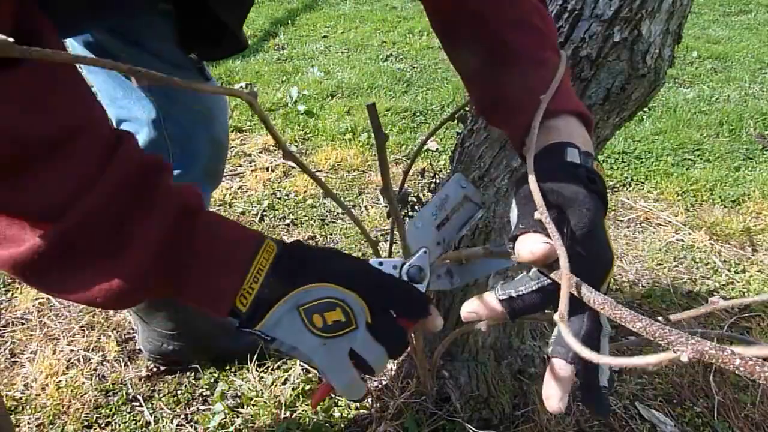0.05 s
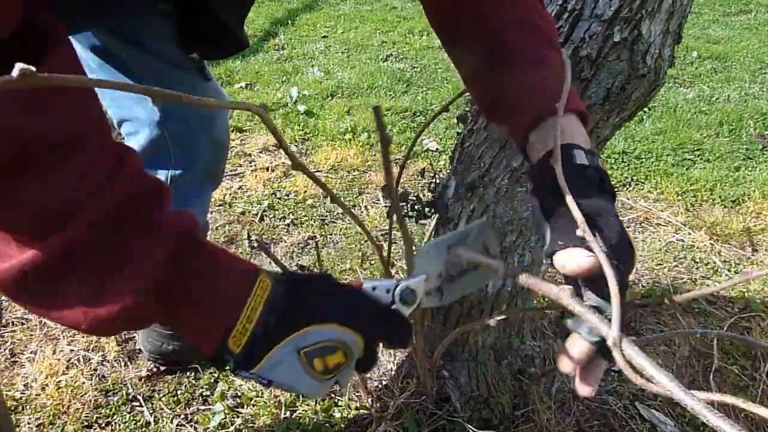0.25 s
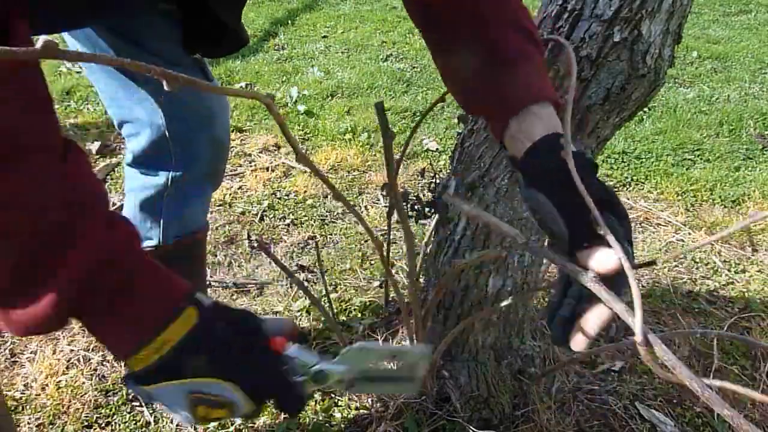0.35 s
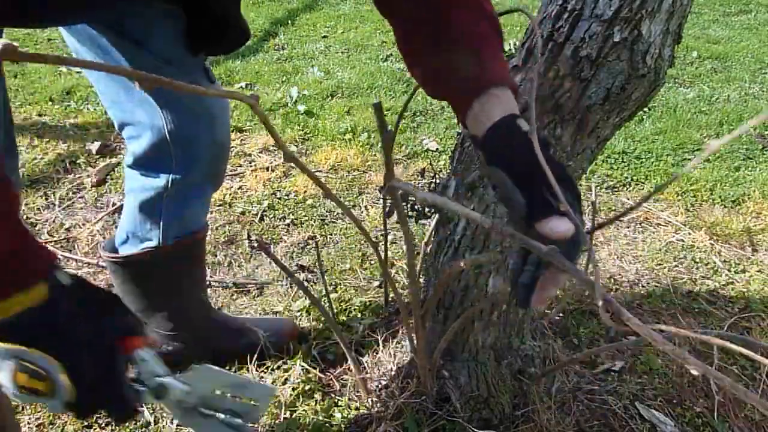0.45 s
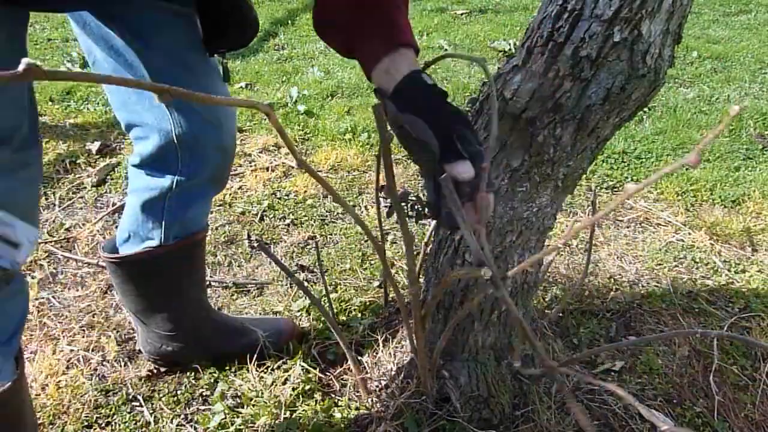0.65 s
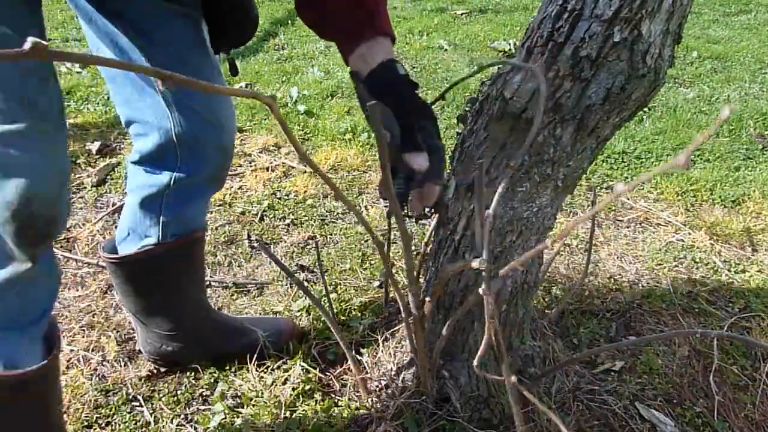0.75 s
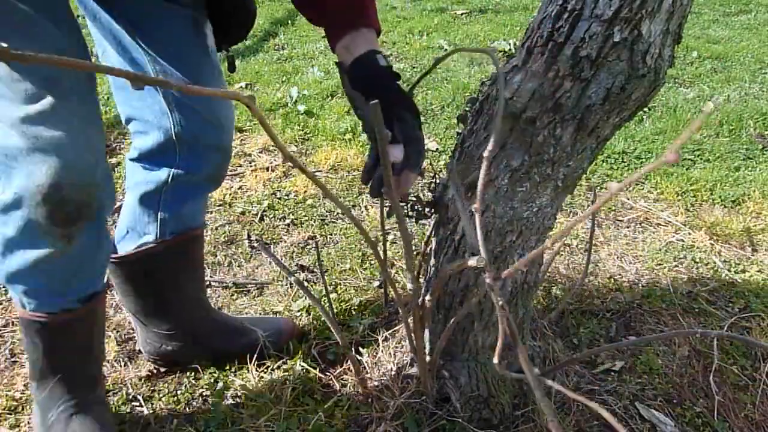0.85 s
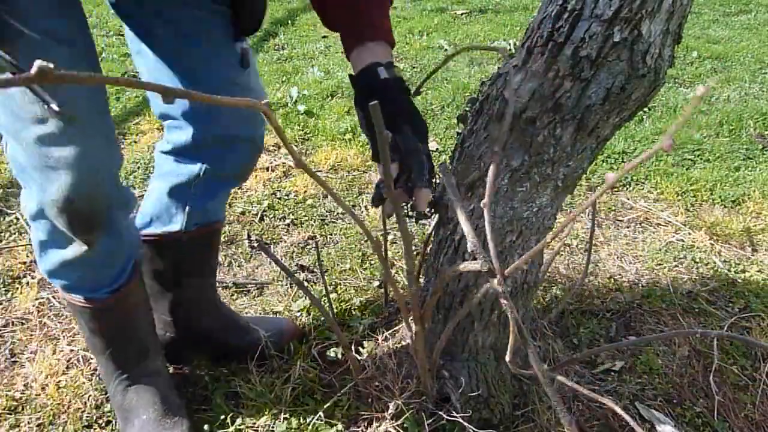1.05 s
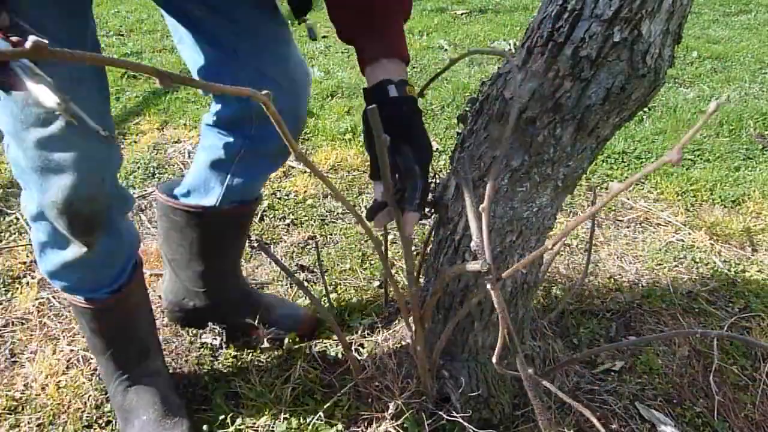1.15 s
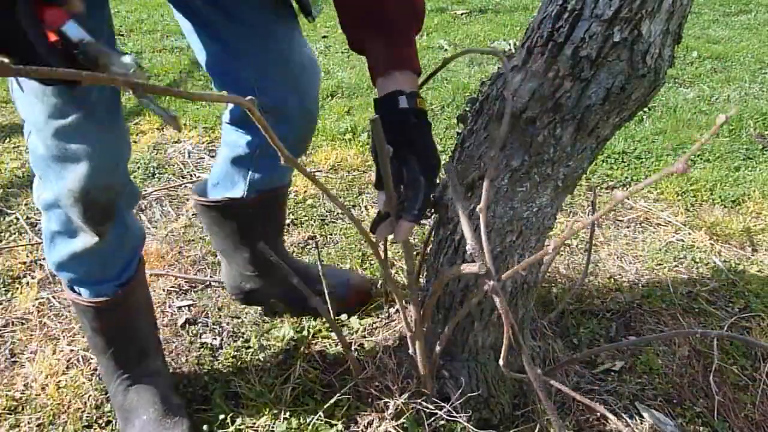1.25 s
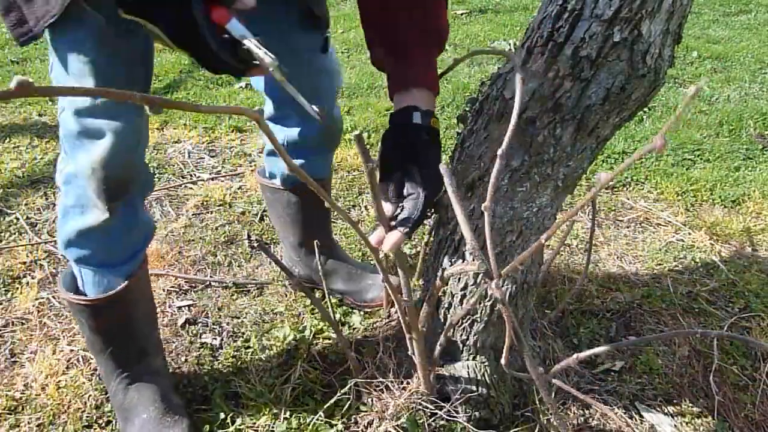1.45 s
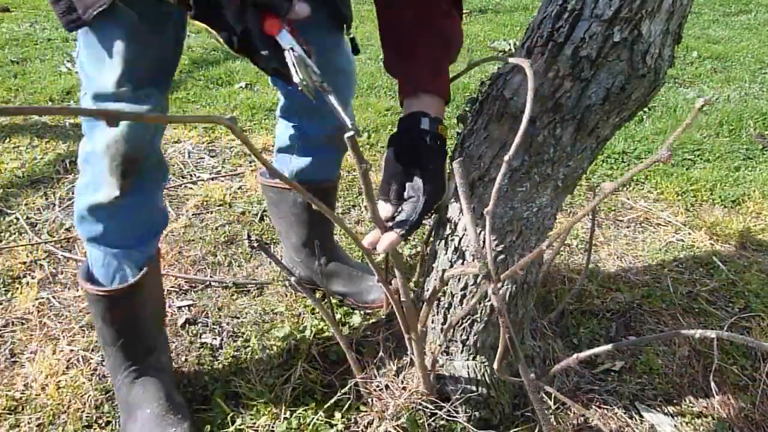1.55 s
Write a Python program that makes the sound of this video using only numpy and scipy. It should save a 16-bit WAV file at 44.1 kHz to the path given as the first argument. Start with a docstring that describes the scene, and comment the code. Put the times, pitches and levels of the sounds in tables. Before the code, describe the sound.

Close up in a garden, shears cut a shoot with a brief crack of fibres and one loud snap. Lighter twig clicks, scraping and soft steps in grass follow, with a faint engine humming far off.

```python
"""Pruning shears in a garden

Hand shears bite through a woody shoot: fibres crack, then the blades snap shut.
The cut shoot is pulled away and clacks against other twigs, and boots shift in dry grass.
Behind it lie the open air and the low hum of a distant engine."""
import sys
import numpy as np
from scipy import signal
from scipy.fft import rfft, irfft, next_fast_len
from scipy.io import wavfile
from scipy.ndimage import map_coordinates

SR = 44100
rng = np.random.default_rng(int(sys.argv[2]) if len(sys.argv) > 2 else 0)


def transcribe(u):
    """Save the signal u as a 16-bit wav file named by the first command-line argument.

    u: samples, shape (n,) or (channels, n), limited to [-1, 1]; the rate is SR.
    q: integer samples, one column per channel.
    """
    v = np.clip(np.atleast_2d(u).T, -1, 1)
    q = np.round(v * 32767).astype(np.int16)
    wavfile.write(sys.argv[1], SR, q)


N = 70560
TOP_HZ = 8900  # nothing sounds above this


def amp(db):
    """Turn decibels into a gain."""
    return 10 ** (np.asarray(db) / 20)


def unit(x):
    """Scale to an average (rms) level of 1."""
    return x / np.sqrt(np.mean(x ** 2) + 1e-20)


def along(points, hz):
    """Join (f/Hz, value) points into a curve on a log axis."""
    f, v = np.transpose(points)
    return np.interp(np.log(hz + 1), np.log(f + 1), v)


def since(s):
    """Seconds since time s, zero before it."""
    return np.maximum(np.arange(N) / SR - s, 0)


def fade(t, t60, attack=0.00014):
    """A quick rise, then a fall of 60 dB every t60 seconds."""
    return (1 - np.exp(-t / attack)) * np.exp(-np.log(1000) * t / t60)


def pan(db):
    """Left and right gains; positive db leans left."""
    return amp(np.array([[db], [-db]]) / 2)


def wobble(rate):
    """A smooth curve through `rate` random points a second."""
    return map_coordinates(rng.standard_normal(int(N * rate / SR) + 4), [np.arange(N) * rate / SR])


def noise(colour, alike):
    """Stereo hiss: colour sets each pitch's level, alike how well left and right match."""
    hz = np.fft.rfftfreq(N, 1 / SR)
    width = np.arccos(np.clip(along(alike, hz), -1, 1)) / 2
    spectrum = rfft(rng.standard_normal((2, N))) * amp(along(colour, hz)) * (hz < TOP_HZ)
    mid, side = irfft(spectrum * [np.cos(width), np.sin(width)], N)
    return unit(np.array([mid + side, mid - side]))


# tone of the open air (f/Hz, level/dB)
AIR_COLOUR = [(25, -21), (50, -16.5), (70, -7.5), (100, -0.5), (140, 1), (200, -3.5), (300, -7.5),
              (600, -7.5), (1000, -7.5), (1400, -14.5), (2500, -19), (6300, -23), (7500, -30.5)]
# how well its left and right match (f/Hz, likeness)
AIR_ALIKE = [(60, 1), (160, 0.92), (430, 0.33), (1200, 0.1), (3000, .1), (7500, .2)]
def air():
    """A soft, low rush whose level wavers."""
    return amp(-49.5 + 1.3 * wobble(12.2)) * noise(AIR_COLOUR, AIR_ALIKE) * pan(0.5)


# tones of the engine (multiple of the pitch, level/dB)
HUM_TONES = [(1, -53), (2, -61)]
def engine(pitch_hz=77.1, wander_hz=1.18):
    """A far engine hums, wavering in pitch and level."""
    turns = np.cumsum(pitch_hz + wander_hz * wobble(6.07)) / SR
    return pan(3) * sum(amp(db + 1.9 * wobble(7.7)) * np.sqrt(2) * np.sin(2 * np.pi * k * turns)
                        for k, db in HUM_TONES)


# tone of the echo (f/Hz, level/dB)
ECHO_COLOUR = [(100, -17), (900, -12), (2500, -14.5), (7500, -19.5)]
# left-right match of the echo and of rustles (f/Hz, likeness)
RUSTLE_ALIKE = [(200, 1), (1500, 0.42), (4000, 0.32), (7500, 0.91)]
def echo(x):
    """Trunk and ground throw back a faint, short answer."""
    tail = noise(ECHO_COLOUR, RUSTLE_ALIKE) * fade(since(0), t60=.05, attack=0.0044)
    return amp(-24.5) * signal.fftconvolve(x, tail / np.linalg.norm(tail[0]), axes=1)[:, :N]


def rustle(curve, colour, rough, grain_rate):
    """Clumps of tiny crackles that fade in and follow a level curve."""
    s, db = np.transpose(curve)
    level = amp(np.interp(np.arange(N) / SR, s, db)) * fade(since(s[0] - .03), np.inf, attack=.02)
    hiss = noise(colour, RUSTLE_ALIKE)
    grains = np.exp(rough * (wobble(grain_rate) + 0.69 * wobble(110)))
    return level * unit(hiss * grains)


# loudness of the scuffing (t/s, level/dB)
BOOT_LEVELS = [(.5, -66), (.64, -52.5), (.72, -49.5), (.8, -48.5), (.88, -50), (.93, -57.5), (1.01, -44),
               (1.07, -46), (1.12, -59.5), (1.21, -53), (1.3, -57), (1.36, -47), (1.42, -49), (1.47, -55),
               (1.6, -57.5)]
# its tone (f/Hz, level/dB)
BOOT_COLOUR = [(100, -15), (250, -5.5), (600, -5.5), (1100, -10), (2200, -13.5), (5000, -23)]
def boots():
    """Boots scuff the turf."""
    return pan(3) * rustle(BOOT_LEVELS, BOOT_COLOUR, rough=0.34, grain_rate=330)


# loudness of the swishing (t/s, level/dB)
GRASS_LEVELS = [(.31, -57.5), (.42, -56), (.48, -53), (.53, -59), (.62, -55.5), (.75, -58.5), (1.1, -58.5),
                (1.16, -56.5), (1.22, -49), (1.28, -54.5), (1.36, -48), (1.43, -46), (1.48, -57),
                (1.6, -56)]
# its tone (f/Hz, level/dB)
GRASS_COLOUR = [(400, -10), (900, -5), (2000, -7), (3500, -0.5), (5500, 0), (7400, -5)]
def grass():
    """Grass and clothes swish as the gardener steps back."""
    return pan(0.5) * rustle(GRASS_LEVELS, GRASS_COLOUR, rough=0.22, grain_rate=2000)


# loudness of the scraping (t/s, level/dB)
BARK_LEVELS = [(.7, -77), (.785, -57.5), (.812, -43.5), (.875, -40.5), (.925, -45), (1.02, -46),
               (1.06, -53.5), (1.12, -61.5)]
# its tone (f/Hz, level/dB)
BARK_COLOUR = [(400, -2.5), (900, -6.5), (1800, -3), (2700, -0.5), (3900, -2.5), (5300, 0), (6700, -1),
               (7500, -12.5)]
def bark():
    """The shoot's bark drags past other twigs."""
    return pan(4.5) * rustle(BARK_LEVELS, BARK_COLOUR, rough=0.41, grain_rate=980)


# left-right match of cracks and knocks (f/Hz, likeness)
HIT_ALIKE = [(200, 0.92), (1200, 1), (2300, 0.44), (4500, 0.71), (7500, 1)]
def burst(envelope, colour, rough):
    """A puff of noise shaped by envelope; rough breaks it into tiny uneven cracks."""
    x = noise(colour, HIT_ALIKE) * np.exp(rough * wobble(2500)) * envelope
    return x * np.sqrt(np.sum(envelope ** 2) / np.mean(np.sum(x ** 2, axis=1)))


# dull knocks (t/s, level/dB, f/Hz, fade time/s)
KNOCKS = [(.337, -44, 750, .055), (.391, -40, 1000, .045), (.443, -47, 1020, 0.057), (0.627, -39, 835, .07),
          (0.953, -34.5, 543, 0.04), (0.983, -35.5, 540, 0.034), (1.003, -38, 610, 0.027),
          (1.021, -34.5, 450, 0.035), (1.208, -40, 494, 0.027), (1.411, -36, 473, 0.037),
          (1.431, -31.5, 505, 0.015), (1.545, -34, 780, 0.018)]
def knocks(width_octaves=.42):
    """Boots and wood bump softly, each bump a noise around one low pitch."""
    hump = [(-4, -40), (-1, -9), (0, 0), (1, -9), (5, -50)]  # (widths from that pitch, level/dB)
    out = np.zeros((2, N))
    for s, db, hz, t60 in KNOCKS:
        colour = [(hz * 2 ** (k * width_octaves), level) for k, level in hump]
        out += amp(db) * burst(fade(since(s), t60, attack=0.00037), colour, rough=0)
    return out * pan(2)


def taps(rows, colour, rough):
    """One short, dry hit for each row."""
    return sum(amp(db) * pan(pan_db) * burst(fade(since(s), t60), colour, rough)
               for s, db, t60, pan_db in rows)


# ticks of stalks (t/s, level/dB, fade time/s, pan/dB)
TICKS = [(.7285, -36.5, 0.023, 6), (.8115, -35.5, 0.044, 0), (.8202, -28, .013, 3.5),
         (.8458, -21.5, 0.013, 1), (.863, -29.5, .009, 11), (.9015, -34, .012, 8), (1.09, -39.5, 0.017, 3)]
# their tone (f/Hz, level/dB)
TICK_COLOUR = [(300, -30), (900, -14), (2500, -22), (3300, -5.5), (4500, -23), (5300, -3.5), (5950, -9.5),
               (6600, 1), (7300, -15)]
def stalks():
    """Dry stalks give thin, bright ticks."""
    return taps(TICKS, TICK_COLOUR, rough=.3)


# clacks of twigs (t/s, level/dB, fade time/s, pan/dB)
CLACKS = [(.6215, -38.5, 0.03, -1), (.7675, -20.5, 0.019, 6.5), (.7708, -27.5, 0.031, 12.5),
          (1.0485, -44, .01, 6), (1.431, -39.5, 0.015, -3), (1.5303, -37, 0.009, 0),
          (1.5472, -35, 0.0099, 1.5)]
# their tone (f/Hz, level/dB)
CLACK_COLOUR = [(100, -12), (400, -4), (820, 2), (1100, -6), (2100, 1), (3050, -5), (3900, 4), (4700, -5),
                (5800, -2.5), (7000, -14), (7500, -9)]
def twigs():
    """The loose shoot strikes other twigs."""
    return taps(CLACKS, CLACK_COLOUR, rough=0.26)


# ringing tones of the wood (f/Hz, level/dB, fade time/s)
WOOD_TONES = [(321, -22.5, 0.027), (530, -30, 0.021), (702, -24.5, .02), (3100, -29.5, 0.016),
              (3470, -33, 0.019)]
def clonk(start_s=1.0468):
    """The cut end drops against the trunk and rings briefly."""
    t = since(start_s)
    out = np.zeros(N)
    for hz, db, t60 in WOOD_TONES:
        phase = rng.uniform(0, 2 * np.pi)
        out += amp(db) * fade(t, t60, attack=0.00056) * np.sin(2 * np.pi * hz * t + phase)
    return out * pan(3.5)


CRACK_T60_S = 0.0067
# fibres giving way under the blade (t/s, level/dB, fade time/s)
FIBRES = [(0.1648, -33, 0.03), (.169, -30.5, 0.02), (.183, -42, 0.057), (0.2174, -21, 0.017),
          (0.2192, -27, 0.043), (0.234, -28.5, 0.045), (0.2389, -21, 0.045), (0.2413, -11, 0.0047),
          (0.2426, -25.5, 0.031), (.249, -33, 0.089), (0.2597, -22.5, 0.02), (0.264, -30, 0.029),
          (0.291, -41, 0.056)]
# their tone (f/Hz, level/dB)
FIBRE_COLOUR = [(88, -45), (150, -18), (611, -12.5), (909, -29.5), (1150, -14.5), (1950, -15), (2220, -5.5),
                (2800, -18.5), (3960, -6.5), (5700, -7.5), (7800, -11), (10100, -40), (17200, -120)]
# tone of the last slice and of the jaws' crack (f/Hz, level/dB)
SLICE_COLOUR = [(40, -36), (150, -1), (450, -3), (1000, -7), (2500, -5), (4800, -2), (7500, -15)]
def cut(slice_s=.2972, length_s=0.0048, jolt_hz=173):
    """Fibres crack in bunches, then the blade runs through the rest and jolts the handles."""
    cracks = sum(amp(db) * burst(fade(since(s), t60), FIBRE_COLOUR, rough=.5) for s, db, t60 in FIBRES)
    t = since(slice_s)
    rise = np.sqrt(np.minimum(t / length_s, 1))
    fall = np.exp(-np.log(1000) * since(slice_s + length_s) / CRACK_T60_S)
    last_slice = amp(-15) * burst(rise * fall, SLICE_COLOUR, rough=.2)
    jolt = amp(-18.5) * fade(t, t60=0.031, attack=0.00093) * np.sin(2 * np.pi * jolt_hz * t)
    return cracks * pan(-1.5) + last_slice + jolt


# the jaws hit their stop and bounce (t/s, level/dB, treble lift/dB per octave)
SNAPS = [(.3015, -3.5, 3), (.303, -17.5, 5)]
# ringing tones of the shears (f/Hz, level/dB, fade time/s)
SHEAR_TONES = [(1008, -9.5, 0.013), (1660, -14.5, 0.014), (2117, -13.5, 0.022), (2650, -6.5, 0.0099),
               (2893, -1.5, 0.011), (3790, -6, 0.0093), (4830, -14, 0.016), (5690, -4.5, 0.006),
               (5700, -10.5, 0.0092), (6220, -15, 0.012), (7520, -17.5, 0.011)]
def snap(spread_rad=0.88):
    """The jaws slam shut; the gloved hand damps their ring at once."""
    out = np.zeros((2, N))
    for s, db, lift_db in SNAPS:
        t = since(s)
        for hz, tone_db, t60 in SHEAR_TONES:
            # left and right ring a little out of step
            phase = rng.normal(0, 0.42) + spread_rad * rng.choice([-1, 1]) * np.array([[.5], [-.5]])
            level = amp(db + tone_db + lift_db * np.log2(hz / 3000))
            out += level * fade(t, t60, attack=0.00015) * np.sin(2 * np.pi * hz * t + phase)
        out += amp(db - 7) * burst(fade(t, CRACK_T60_S), SLICE_COLOUR, rough=0.21)  # the crack
    return out * pan(-1)


def scene(low_cut_hz=95):
    """Add up all the sounds; only the hits get an echo."""
    low_cut = signal.butter(2, low_cut_hz, "highpass", fs=SR, output="sos")
    shears = signal.sosfilt(low_cut, cut() + snap())
    hits = shears + twigs() + stalks() + knocks() + clonk()
    rustles = bark() + grass() + boots()
    return hits + echo(hits) + rustles + engine() + air()


# how the highest treble falls away (f/Hz, level/dB)
TREBLE_CUT = [(7400, 0), (7750, -9), (8000, -26), (8600, -38)]
def record(dry, ceiling=.77):
    """Flatten peaks above the ceiling and remove the highest treble."""
    padded = 2 * next_fast_len(N)
    hz = np.fft.rfftfreq(padded, 1 / SR)
    spectrum = rfft(np.clip(dry, -ceiling, ceiling), padded)
    return irfft(spectrum * amp(along(TREBLE_CUT, hz)) * (hz < TOP_HZ), padded)[:, :N]


dry = scene()
out = record(dry)
transcribe(out)
```